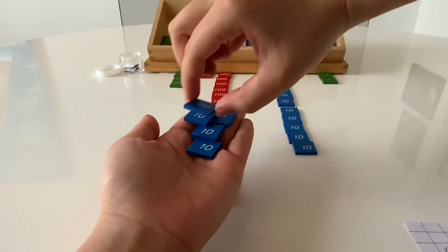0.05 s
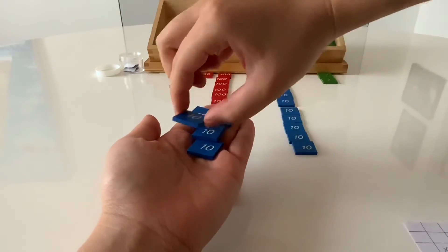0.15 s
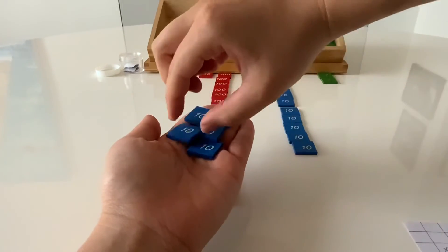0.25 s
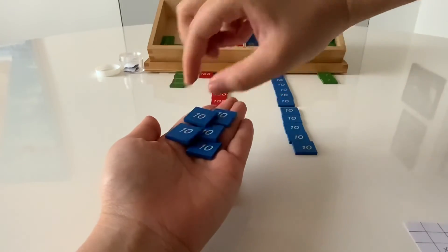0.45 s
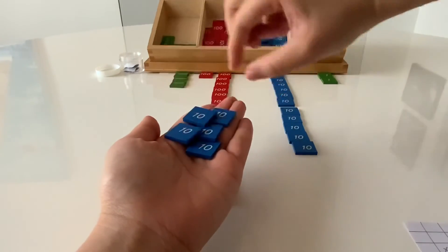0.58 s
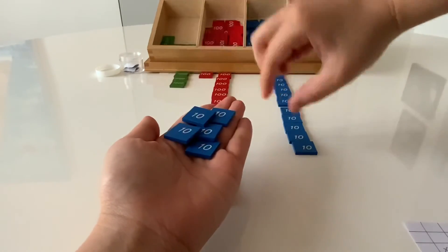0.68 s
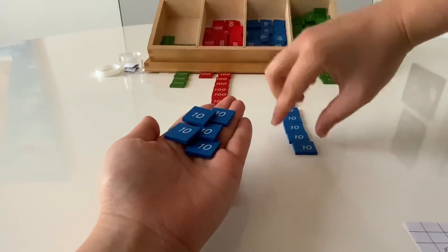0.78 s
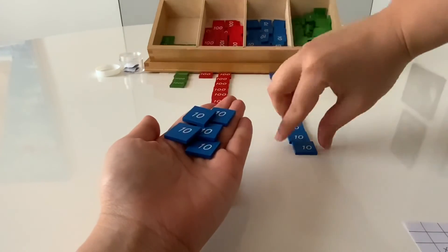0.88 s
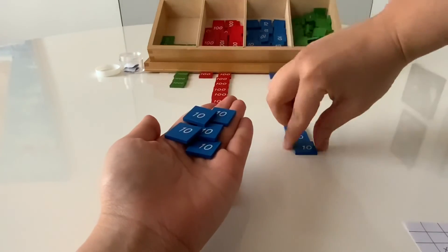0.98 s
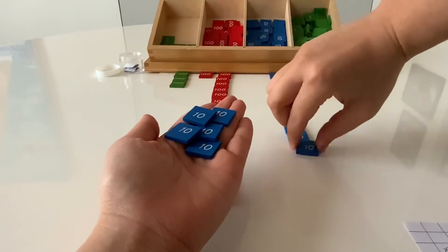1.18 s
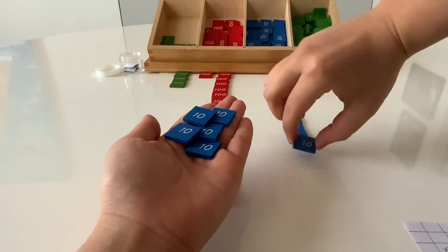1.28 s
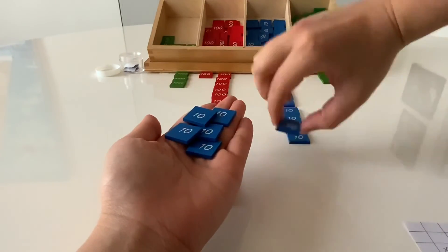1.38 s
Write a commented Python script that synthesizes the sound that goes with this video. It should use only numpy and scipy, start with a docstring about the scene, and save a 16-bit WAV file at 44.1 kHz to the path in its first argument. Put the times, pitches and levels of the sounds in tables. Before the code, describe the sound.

One quick, light clatter of a little tile landing on others in a quiet room.

```python
"""A tile dropped into a palm

A small hard tile lands on a few others in a hand, close by. It strikes, bounces and settles
within 60 ms: one bright clatter, damped at once by the hand. Nearby things and a small room
echo faintly over a low rumble of air. Later, fingers very softly brush a tile on the table."""
import sys
import numpy as np
from scipy import signal
from scipy.fft import rfft, irfft
from scipy.io import wavfile

SR = 44100
rng = np.random.default_rng(int(sys.argv[2]) if len(sys.argv) > 2 else 0)


def put_to_file(sound):
    """Save the sound as 16-bit audio at rate SR, in the file named by the first command-line argument."""
    columns = np.atleast_2d(sound).T  # one column per channel
    safe = np.clip(columns, -1, 1)
    whole_steps = np.round(safe * 32767)
    wavfile.write(sys.argv[1], SR, whole_steps.astype(np.int16))


N = 63945
TIMES, FREQS = np.arange(N) / SR, np.fft.rfftfreq(N, 1 / SR)


def amp(db):
    """Turns decibels into a number to multiply by."""
    return 10 ** (np.asarray(db) / 20)


def unit(x):
    """Scales a signal to an average (rms) size of 1."""
    return x / np.sqrt(np.mean(x ** 2) + 1e-20)


def curve(points, hz):
    """Joins a table's points smoothly along a pitch (log-frequency) scale."""
    f, value = np.transpose(points)
    return np.interp(np.log(hz + 1), np.log(f + 1), value)


def fade(t, fade_s):
    """Dies away by 60 dB in fade_s seconds, the fade time."""
    return np.exp(-np.log(1000) * t / fade_s)


def stereo_noise(size, likeness=.65):
    """One noise for each ear; a likeness of 1 makes them the same."""
    a, b = rng.standard_normal((2, size))
    return np.array([a, likeness * a + np.sqrt(1 - likeness ** 2) * b])


# Tone of the air, from bass to treble: f/Hz, relative level/dB
AIR_TONE = [(25, -24), (39, -14.5), (62, -4), (85, -0.5), (130, -4.5), (210, -5.5), (390, -7), (500, -10),
            (720, -10), (1000, -17.5), (1600, -24), (2500, -32.5), (3400, -37.5), (4700, -47), (7500, -52),
            (10000, -52.5), (14000, -54.5)]
# How alike the air is in both ears: f/Hz, likeness (1 same, -1 opposite)
AIR_LIKENESS = [(60, 0.97), (150, 0.99), (300, 0.83), (600, -0.025), (1200, -0.32), (2500, 0.052),
                (8000, 0.77)]
# Which side the air is louder on: f/Hz, left minus right/dB
AIR_BALANCE = [(60, 0), (150, -2), (380, -0.5), (950, 1.5), (2380, -1.5), (5980, -2.5), (15000, 0.5)]
# Faint hums in the air: f/Hz, level/dB, width/Hz
HUMS = [(86, -67, 9), (165.7, -64, 16), (250.3, -70, 8.1), (395, -66.5, 17), (727.4, -76, 20),
        (1230.3, -74.5, 13), (3540, -91.5, 60)]

def room_air(level_db=-54, cutoff_hz=14600):
    """Steady rumble and hiss with a few blurred hums; the bass is alike in both ears."""
    a, b = rfft(rng.standard_normal((2, N)))
    likeness = curve(AIR_LIKENESS, FREQS)
    noise = np.array([a, likeness * a + np.sqrt(1 - likeness ** 2) * b])
    balance = amp(np.outer([.5, -.5], curve(AIR_BALANCE, FREQS)))
    treble_cut = 1 / np.sqrt(1 + (FREQS / cutoff_hz) ** 80)
    power = (amp(level_db) * unit(amp(curve(AIR_TONE, FREQS)) * treble_cut)) ** 2
    for hz, db, width in HUMS:
        hum = unit(np.exp(-((FREQS - hz) / width) ** 2))
        power += (amp(db) * hum) ** 2
    return irfft(noise * balance * np.sqrt(power), N)


# Brushes of the fingers: loudest at t/s, length/s, f/Hz, width/Hz, level/dB
RUBS = [(0.975, 0.062, 2900, 420, -82), (1.25, 0.55, 2980, 750, -86.5), (1.213, 0.046, 5800, 560, -92)]

def fingers():
    """Skin rubbing on a tile makes soft swells of hiss."""
    out = np.zeros(N)
    for peak_s, length, hz, width, db in RUBS:
        band = np.exp(-((FREQS - hz) / width) ** 2)
        hiss = unit(irfft(rfft(rng.standard_normal(N)) * band, N))
        swell = np.exp(-(2 * (TIMES - peak_s) / length) ** 2)
        out += amp(db) * hiss * swell
    return out


# How long the room rings: f/Hz, fade time/s
ROOM_FADE = [(500, .3), (3000, .27), (6000, .32), (9300, .275), (11000, .21), (14000, .19)]
# Tone of the echoes: f/Hz, level/dB
ROOM_TONE = [(500, 0), (3000, 2), (4600, 4), (5800, 1), (7600, 4.5), (8600, -1.5), (9050, -4), (9600, -2),
             (10600, 4.5), (12600, 7), (13750, 2.5), (15000, 4), (16500, -5)]

def room_echo(sound, tail_db=-19.5, near_db=-22, build_s=.010):
    """Sound bounces quickly off nearby things and lingers in the room as a faint tail."""
    hz, frame_times, spectrum = signal.stft(stereo_noise(SR), SR, nperseg=256)
    spectrum = spectrum * fade(frame_times, curve(ROOM_FADE, hz)[:, None])
    tail = signal.istft(spectrum, SR)[1][:, :SR]
    t = TIMES[:SR]
    near = stereo_noise(SR) * fade(t, fade_s=.13)
    rise = np.minimum(t / build_s, 1) ** 2
    echoes = (amp(tail_db) * unit(tail * rise) + amp(near_db) * unit(near * rise)) / np.sqrt(SR)
    tone = amp(curve(ROOM_TONE, np.fft.rfftfreq(SR, 1 / SR)))
    echoes = irfft(rfft(echoes) * tone, SR)
    return signal.fftconvolve(sound, echoes[:, :SR // 2], axes=1)[:, :N]


# Notes a struck tile rings with: f/Hz, relative level/dB, fade time/s, group (0 main, 1 low, 2 high)
TILE_NOTES = [(4900, -6, .005, 1), (5750, 0, .0035, 1), (6800, -5, .0035, 1), (7800, -21, .007, 0),
              (8620, -7.3, .007, 0), (9500, -2.8, .0105, 0), (11300, -13, .005, 2), (12300, -10, .004, 2),
              (13750, -2, .005, 2), (15300, -8, .004, 2)]
# Tone of the sharp crack: f/Hz, relative level/dB
CRACK_TONE = [(300, -14), (1200, -5), (2400, -6), (3400, -5), (4400, -1), (7000, 1), (10300, -3.5),
              (13000, -3), (16000, -3)]

def tile_hit(start_s, main_db, low_db, high_db, crack_db, build_s):
    """Tile meets tile: returns a brief ring and a noisy crack, each for both ears."""
    ear_delay_s = np.array([[.000007], [0]])  # the left ear hears it just after the right
    t = np.maximum(TIMES - start_s - ear_delay_s, 0)
    rise = np.sin(np.pi / 2 * np.minimum(t / build_s, 1)) ** 2
    group_db = [main_db, low_db, high_db]
    detune = 1 + .0046 * rng.uniform(-1, 1, len(TILE_NOTES))  # each hit rings a little differently
    ring = np.zeros((2, N))
    for k, (hz, db, fade_s, group) in enumerate(TILE_NOTES):
        swing = (-1) ** k * np.sin(2 * np.pi * hz * detune[k] * t)  # neighbours swing opposite ways
        ring += amp(db + group_db[group]) * fade(t, fade_s) * swing
    noise = unit(irfft(rfft(stereo_noise(N)) * amp(curve(CRACK_TONE, FREQS)), N))
    chatter = amp(-13) * fade(t, fade_s=.022)  # the faces rattle briefly as the hit ends
    shape = fade(t, fade_s=.005) + chatter
    crack = amp(crack_db) * noise * shape / shape.max()
    return rise * np.array([ring, crack])


# The landing and its bounces: t/s, level/dB (main notes, low notes, high notes, crack), build-up/s
HITS = [(0.2454, -24, -22, -18.5, -30, .0003), (0.2511, -47, -46, -41.5, -45, .0003),
        (0.2577, -34, -35.5, -30.5, -37, .0003), (0.2618, -33, -30, -31, -24.5, .0002),
        (0.2621, -15.3, -37, -33, -33, .0004), (0.2635, -26, -41, -35, -35, .0002),
        (0.2724, -19, -36, -34, -40, .0004), (0.2741, -29, -40, -40, -42, .0006),
        (0.2757, -11.3, -28, -22.5, -33, .0005), (0.2790, -34, -35, -35, -39, .0012),
        (0.3035, -41, -39, -54, -49, .0008)]
# The tiles lie slightly to the right: f/Hz, left minus right/dB
TILE_BALANCE = [(2000, -2), (5500, -4.5), (8600, -2), (9500, .5), (14000, -.5)]

def tile_clatter(bass_cut_hz=3200):
    """The ring and crack of all the hits; a tile is too small to give off much bass."""
    hits = sum(tile_hit(*row) for row in HITS)
    balance = amp(np.outer([.5, -.5], curve(TILE_BALANCE, FREQS)))
    clatter = irfft(rfft(hits) * balance, N)
    return signal.sosfilt(signal.butter(2, bass_cut_hz, "high", fs=SR, output="sos"), clatter)


def scene():
    """The clatter, its echoes, the fingers and the room air together."""
    ring, crack = tile_clatter()
    echo = room_echo(ring + amp(2) * crack)  # the crack spreads wider, so the room gets more of it
    return ring + crack + echo + fingers() + room_air()


def record(dry):
    """Takes away the highest treble, above 16400 Hz."""
    treble_cut = signal.firwin(255, 16400, window=("kaiser", 9), fs=SR)
    return signal.oaconvolve(dry, treble_cut[None], "same")


dry = scene()
out = record(dry)
put_to_file(out)
```